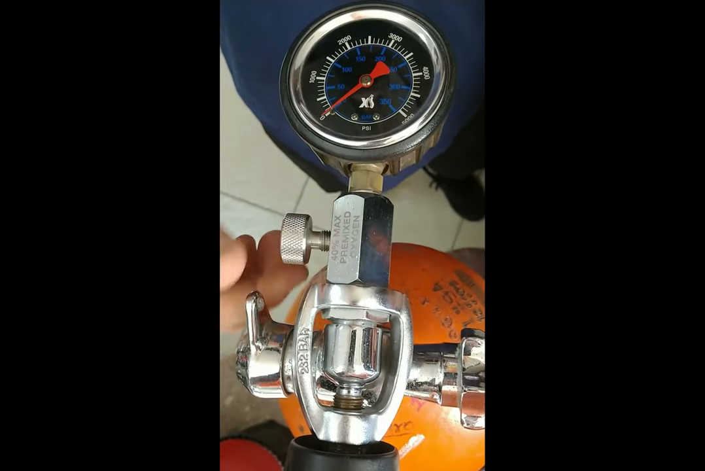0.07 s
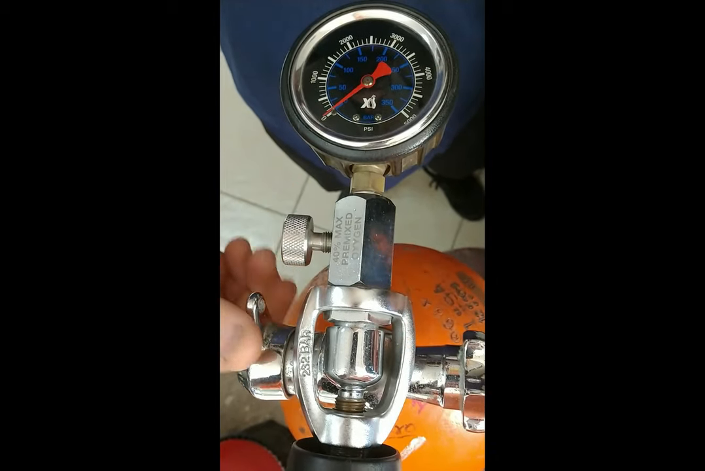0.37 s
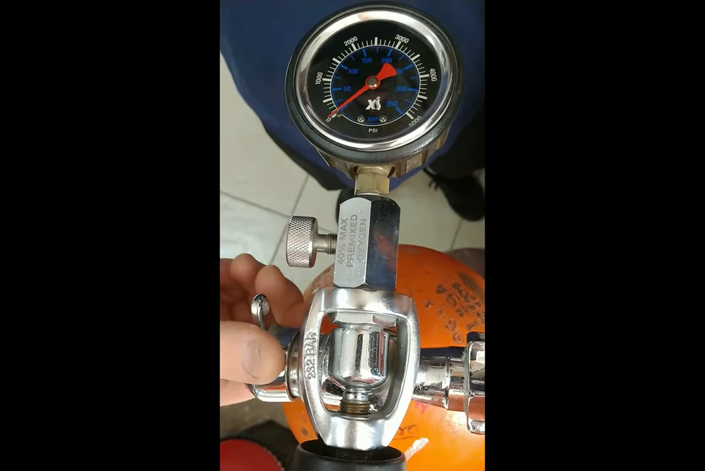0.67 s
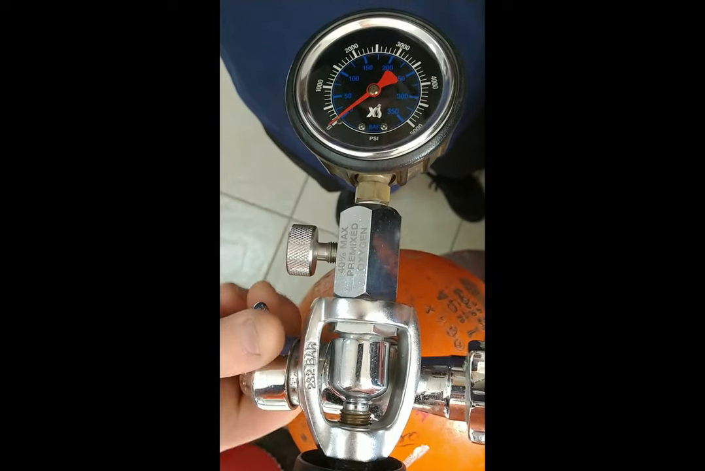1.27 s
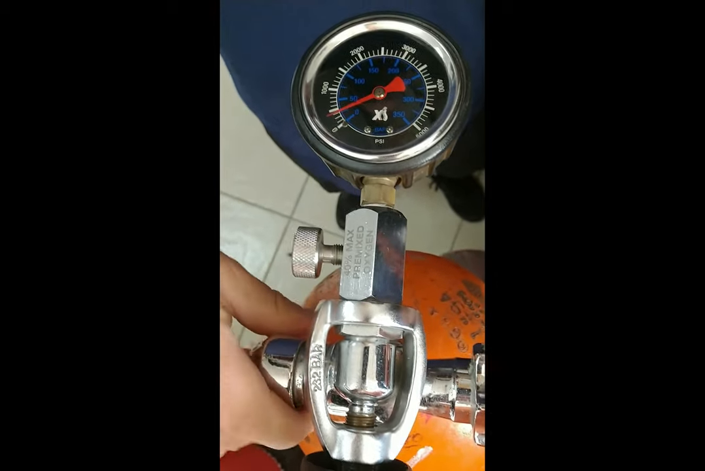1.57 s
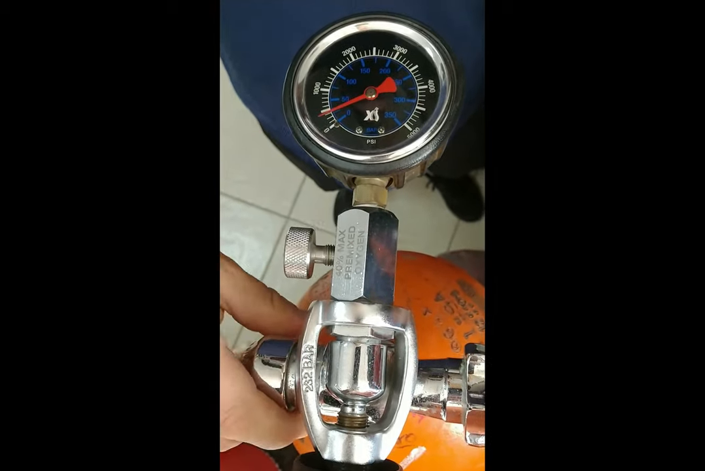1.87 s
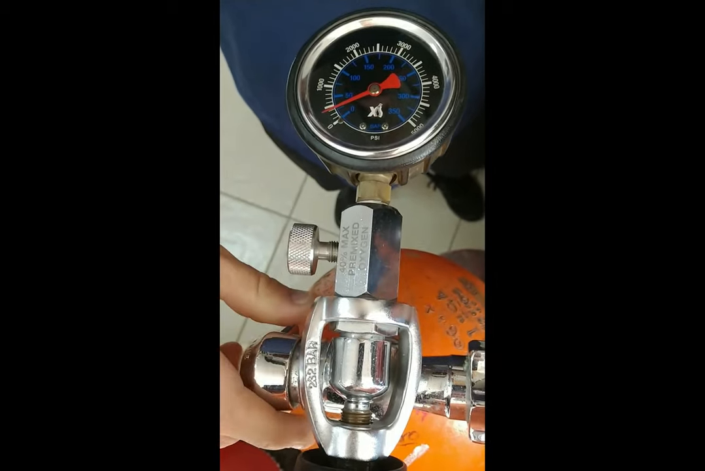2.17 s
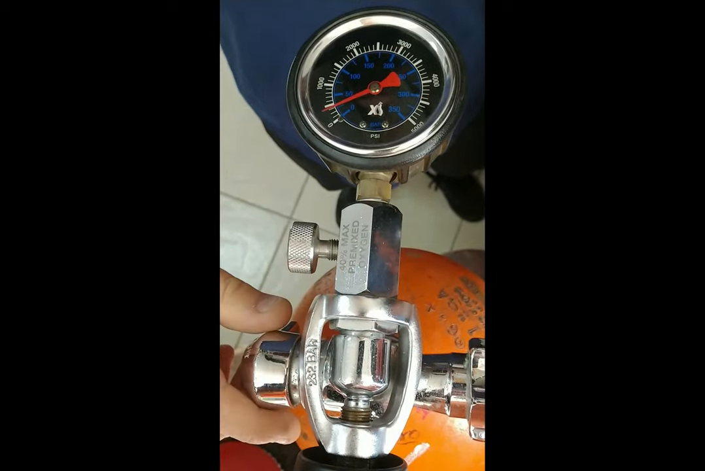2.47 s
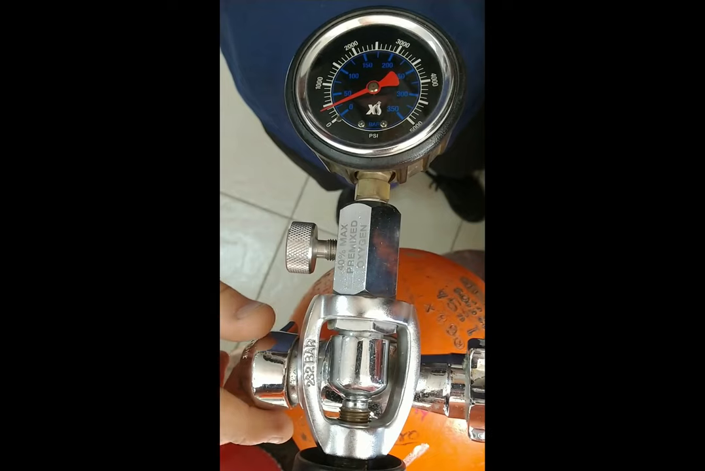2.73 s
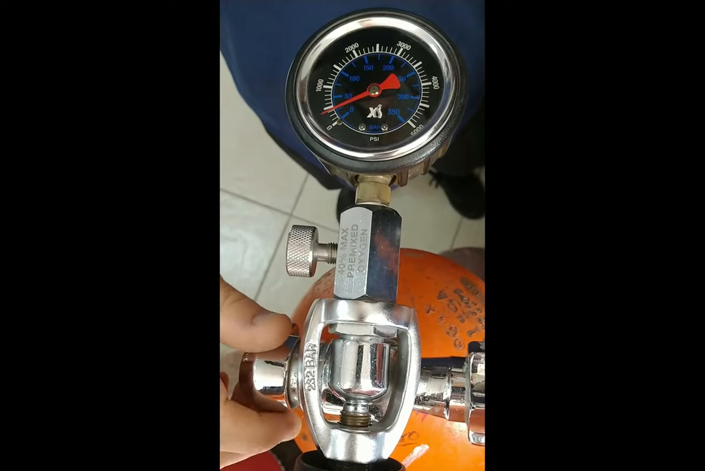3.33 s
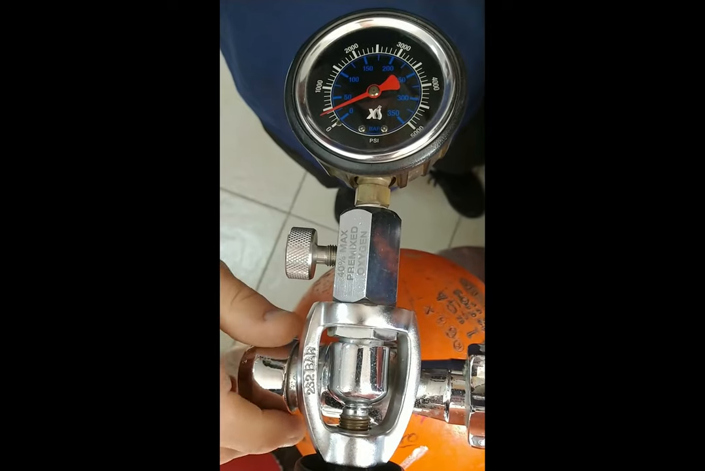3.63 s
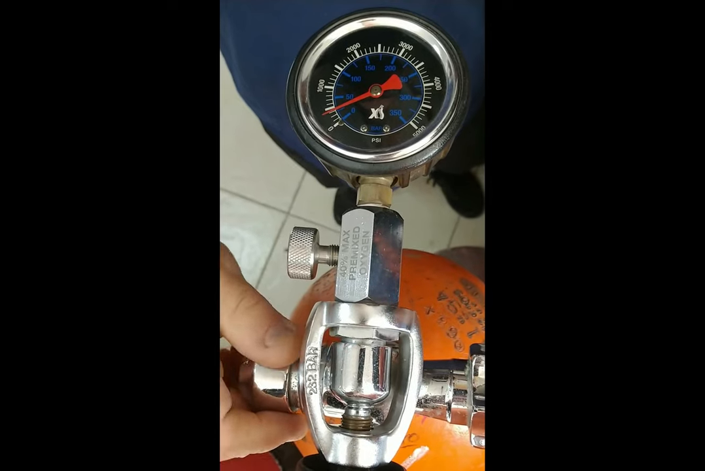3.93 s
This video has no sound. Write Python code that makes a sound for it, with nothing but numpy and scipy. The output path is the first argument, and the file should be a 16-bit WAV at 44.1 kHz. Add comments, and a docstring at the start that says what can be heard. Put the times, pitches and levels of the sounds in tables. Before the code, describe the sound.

Compressed air hisses from a scuba tank valve, close up in a tiled room. A soft puff dies away by about 0.4 seconds, leaving a thin leak and a low, hollow rumble that fades by 1.5 seconds. At 1.6 seconds a loud jet starts abruptly, ringing in the metal fitting and nearly whistling around 2.3 seconds. From about 2.5 seconds it holds as a steady, bright hiss.

```python
"""A last puff of air dies away at the bleed screw of a scuba tank's gauge, close to the microphone.
Under it, in a tiled room, lie a thin leak and a low rumble while a hand moves to the knob.
The valve cracks open: a loud jet of compressed air surges through the metal fitting and rings its
resonances, then settles to a steady, bright hiss."""
import sys
import numpy as np
from scipy import signal
from scipy.fft import rfft, irfft, next_fast_len
from scipy.io import wavfile
from scipy.ndimage import uniform_filter1d, map_coordinates

SR = 44100
rng = np.random.default_rng(int(sys.argv[2]) if len(sys.argv) > 2 else 0)


def bounce(signal):
    """Save signal as a 16-bit WAV file at the path given by the first command-line argument."""
    frames = np.transpose(np.atleast_2d(signal))
    limited = np.clip(frames, -1, 1)
    pcm = np.round(limited * 32767).astype(np.int16)
    wavfile.write(sys.argv[1], SR, pcm)


N = 176400

# Broad hiss of the jet as it surges (frequency [Hz], relative level [dB])
SURGE_SPECTRUM = [(30, -48), (60, -30), (120, -20.5), (200, -18.5), (340, -12), (700, -7.5), (1150, -4),
                  (1900, 0.5), (2650, -3), (3500, 0.3), (6500, -0.5), (8500, 0), (12000, -0.2),
                  (15500, -0.5)]
# Broad hiss of the jet in steady flow (frequency [Hz], relative level [dB])
STEADY_SPECTRUM = [(30, -52), (60, -31), (120, -18.5), (200, -15), (340, -10.5), (750, -8), (1150, -4.5),
                   (1900, -2.1), (2650, -2.5), (3800, -1.2), (6000, 1.05), (8500, 0.4), (12000, 0.9),
                   (15500, -0.35)]
# Resonances of the metal fitting (frequency [Hz], width [Hz], surge lift [dB], steady lift [dB])
FITTING_RESONANCES = [(350, 38, 4.5, 3.5), (1127, 57, 6.5, 1.5), (1365, 74, 6.5, 6), (1850, 120, 9, 6.5),
                      (2285, 83, 5.5, -2), (3220, 170, 2.5, 1.5), (4430, 96, 2.5, 3), (5160, 100, 3, 1),
                      (5840, 180, 5, 1), (6460, 130, 5.5, 3), (6900, 340, 4, 0), (7900, 180, 2, -0.5),
                      (9470, 350, 2, 1.5), (10600, 150, 3, 3), (14400, 700, 0, 2)]
def jet():
    """The open valve, close up: air surges through the fitting, nearly whistles, then flows steadily."""
    open_s, attack_s = 1.612, 0.0082
    settle_s, settle_width_s = 2.437, 0.03
    surge_db, climb_db_per_s, steady_db, whistle_db = -17.5, 0.3, -18.5, -32
    t = np.arange(N) / SR
    since_open = np.maximum(t - open_s, 0)
    opening = 1 - np.exp(-since_open / attack_s)
    settled = .5 + .5 * np.tanh((t - settle_s) / settle_width_s / 2)
    surge_peaks = [(hz, width, db) for hz, width, db, _ in FITTING_RESONANCES]
    steady_peaks = [(hz, width, db) for hz, width, _, db in FITTING_RESONANCES]
    surge = amp(surge_db + climb_db_per_s * since_open) * rush(SURGE_SPECTRUM, surge_peaks)
    steady = amp(steady_db) * rush(STEADY_SPECTRUM, steady_peaks)
    # The fitting's main resonance stands out at the top of the surge.
    whistle_gain = amp(whistle_db) * bell_curve(t, centre=2.288, sigma=0.074)
    whistle = whistle_gain * resonance(centre_hz=1840, half_width_hz=46)
    flutter_db = 0.26 * wobble(7) + 0.27 * wobble(70)
    flow = np.sqrt(1 - settled) * (surge + whistle) + np.sqrt(settled) * steady
    return opening * amp(flutter_db) * flow


# Fade of the puff at the bleed screw (time [s], body level [dB], treble level [dB])
PUFF_LEVELS = [(0, -35.5, -31), (.07, -34, -34), (.17, -38, -44), (.3, -34, -44), (.35, -38, -55),
               (.41, -46.5, -62), (.6, -50.5, -60), (.85, -51, -70), (1.2, -53, -75), (1.55, -57, -80)]
# Hollow body of the puff (frequency [Hz], relative level [dB])
PUFF_BODY = [(500, -26), (1000, -11.5), (1500, -7.5), (2000, -1.5), (2500, -11), (3400, -14.5), (4200, -27)]
# Treble of the puff (frequency [Hz], relative level [dB])
PUFF_TREBLE = [(1800, -27), (2600, -8), (3200, 2), (3900, -5), (6000, -6.5), (8000, -11.5), (10000, -14),
               (15000, -14)]
# Resonances of the puff (frequency [Hz], width [Hz], lift [dB])
PUFF_RESONANCES = [(1410, 90, 8), (1760, 210, 4.5), (3130, 220, -1), (6000, 230, 3), (7800, 260, 8)]
def bleed_puff():
    """Air escapes at the gauge's bleed screw, near the microphone, and loses its treble first."""
    body_db, treble_db = curves(PUFF_LEVELS)
    flutter_db = .6 * wobble(50.5)
    body = amp(body_db) * rush(PUFF_BODY, PUFF_RESONANCES)
    treble = amp(treble_db) * rush(PUFF_TREBLE, PUFF_RESONANCES)
    return amp(flutter_db) * (body + treble)


# Broad hiss of the leak (frequency [Hz], relative level [dB])
LEAK_SPECTRUM = [(500, -37), (1000, -6.5), (1700, -12.5), (2600, -8), (4000, -6), (5500, -5), (9000, -3.5),
                 (15500, -3)]
# Resonances of the leak (frequency [Hz], width [Hz], lift [dB])
LEAK_RESONANCES = [(3460, 170, 4), (5150, 410, 4), (6900, 170, 2.5), (8760, 300, 5.5), (11700, 150, 2),
                   (13720, 180, 3), (14820, 320, 4)]
def leak():
    """Air seeps from the fitting in a thin, even hiss at close range."""
    level_db = -38 + .25 * wobble(7.5)
    return amp(level_db) * rush(LEAK_SPECTRUM, LEAK_RESONANCES)


# Swells of the rumble (time [s], bass level [dB], hollow resonance level [dB], midrange level [dB])
RUMBLE_LEVELS = [(0, -43, -51, -46), (.2, -40, -47.5, -44), (.3, -46, -48.5, -43), (.49, -40.5, -52, -46),
                 (.7, -46.5, -49, -44.5), (.83, -39, -48, -45), (.88, -45, -42.5, -45),
                 (.98, -42, -39.5, -42), (1.03, -51, -40, -45.5), (1.13, -52, -50, -48.5),
                 (1.31, -49, -46.5, -48), (1.42, -54, -56, -52.5), (1.51, -64, -55, -55),
                 (1.7, -72, -61, -53)]
# Bass of the rumble (frequency [Hz], relative level [dB])
RUMBLE_BASS = [(25, -26), (50, -12), (85, -0.5), (140, 1.5), (200, -4.5), (300, -7.5), (600, -40)]
# Midrange of the rumble (frequency [Hz], relative level [dB])
RUMBLE_MIDRANGE = [(120, -20.5), (220, 1.5), (340, -3), (480, 2.5), (620, 0.5), (820, -1.5), (1150, -1.5),
                   (1700, -12.5), (3000, -30)]
def rumble():
    """Beneath the air, a hollow rumble swells as the hand takes the knob and fades before the jet."""
    bass_db, hollow_db, midrange_db = curves(RUMBLE_LEVELS)
    bass = amp(bass_db) * rush(RUMBLE_BASS)
    hollow = amp(hollow_db) * resonance(centre_hz=289, half_width_hz=38)
    midrange = amp(midrange_db) * rush(RUMBLE_MIDRANGE)
    return bass + hollow + midrange


def tiled_room(x, t60_s=0.28, level_db=-8):
    """Short reflections come back to the microphone from tiles and tank, combing the hiss finely."""
    t = np.arange(SR // 2) / SR
    tail = rng.standard_normal(len(t)) * amp(-60 * t / t60_s)
    return amp(level_db) * signal.fftconvolve(x, tail / np.linalg.norm(tail))[:N]


def turbulence(x, depth_db=1.07):
    """Turbulence shifts the colour of the hiss in small patches of frequency and time."""
    spectrogram = signal.stft(x, nperseg=1024)[2]
    patches = uniform_filter1d(rng.standard_normal(spectrogram.shape), size=3, axis=0)  # about 130 Hz
    patches = uniform_filter1d(patches, size=12, axis=1)  # about 0.14 s
    return signal.istft(spectrogram * amp(depth_db * unit(patches)), nperseg=1024)[1][:N]


def midrange_dip(x, depth=.98):
    """A narrow band of the midrange drops out briefly just before the valve opens."""
    t = np.arange(N) / SR
    band = filtered(x, lambda hz: bell_curve(hz, centre=850, sigma=91))
    return x - depth * bell_curve(t, centre=1.38, sigma=.1) * band


def rush(spectrum, peaks=()):
    """Turbulent noise of rms 1 with a broad colour, lifted at each resonance."""
    def response(hz):
        knot_hz, knot_db = np.transpose(spectrum)
        colour_db = np.interp(np.log(hz + 1), np.log(knot_hz + 1), knot_db)
        lift_db = sum(db / (1 + (2 * (hz - centre) / width) ** 2) for centre, width, db in peaks)
        return amp(colour_db + lift_db)
    return unit(filtered(rng.standard_normal(N), response))


def resonance(centre_hz, half_width_hz):
    """Noise of rms 1 ringing in one narrow resonance."""
    noise = rng.standard_normal(N)
    return unit(filtered(noise, lambda hz: 1 / (1 + ((hz - centre_hz) / half_width_hz) ** 2)))


def filtered(x, response):
    """x shaped by a gain that depends on frequency."""
    size = next_fast_len(N + SR // 2)
    hz = np.fft.rfftfreq(size, 1 / SR)
    return irfft(rfft(x, size) * response(hz), size)[..., :N]


def wobble(knots_per_s):
    """A smooth random curve."""
    knots = rng.standard_normal(int(N * knots_per_s / SR) + 4)
    return map_coordinates(knots, [np.arange(N) * knots_per_s / SR])


def curves(rows):
    """One value per sample for each column after the time."""
    times, *columns = np.transpose(rows)
    return [np.interp(np.arange(N) / SR, times, column) for column in columns]


def bell_curve(x, centre, sigma):
    """A Gaussian of height 1."""
    return np.exp(-.5 * ((x - centre) / sigma) ** 2)


def amp(db):
    """Decibels to gain."""
    return 10 ** (np.asarray(db) / 20)


def unit(x):
    """Scaled to rms 1."""
    return x / np.sqrt(np.mean(x ** 2) + 1e-20)


def scene():
    """One microphone close to the valve hears the air, its reflections and the rumble, all centred."""
    air = turbulence(jet() + leak() + bleed_puff())
    mono = midrange_dip(air + tiled_room(air) + rumble())
    return np.array([mono, mono])


def record(dry):
    """The recorder keeps nothing above its band limit."""
    band_limit_hz = 15790
    return filtered(dry, lambda hz: hz < band_limit_hz)


dry = scene()
out = record(dry)
bounce(out)
```